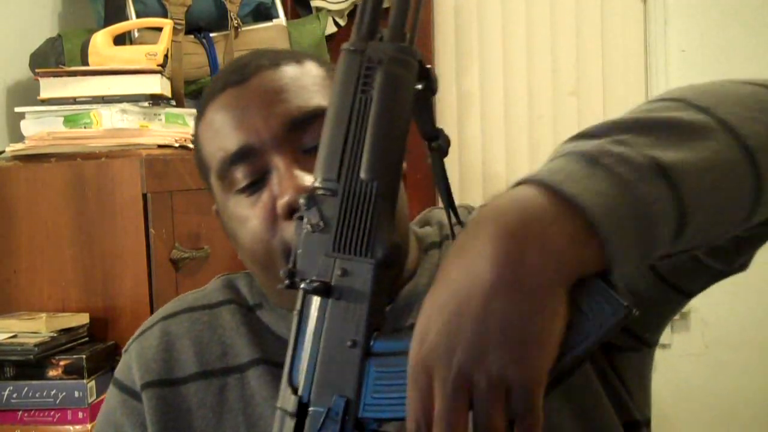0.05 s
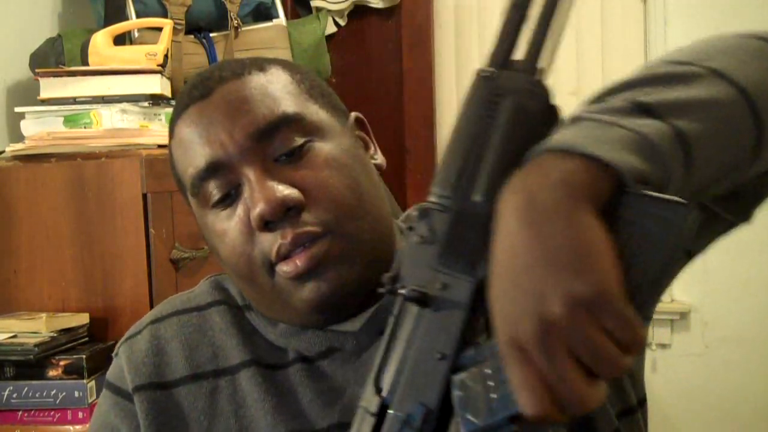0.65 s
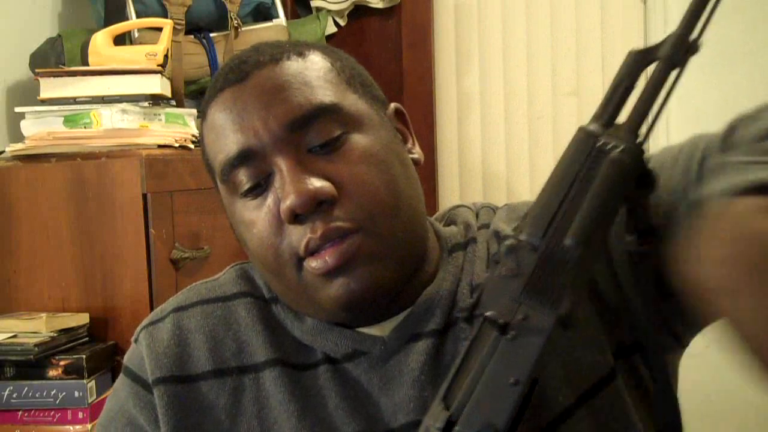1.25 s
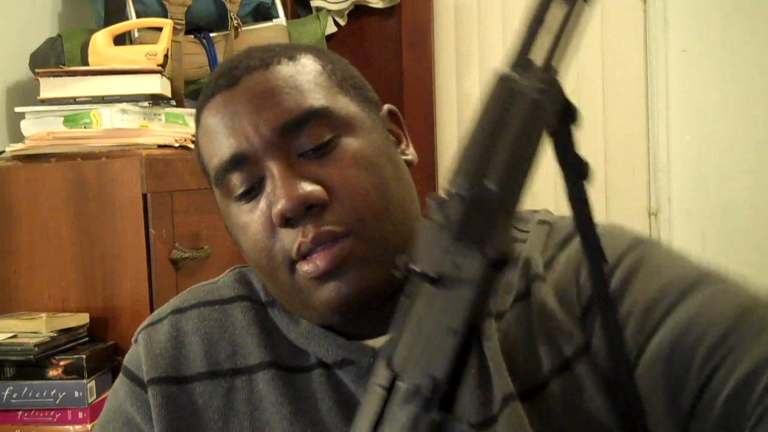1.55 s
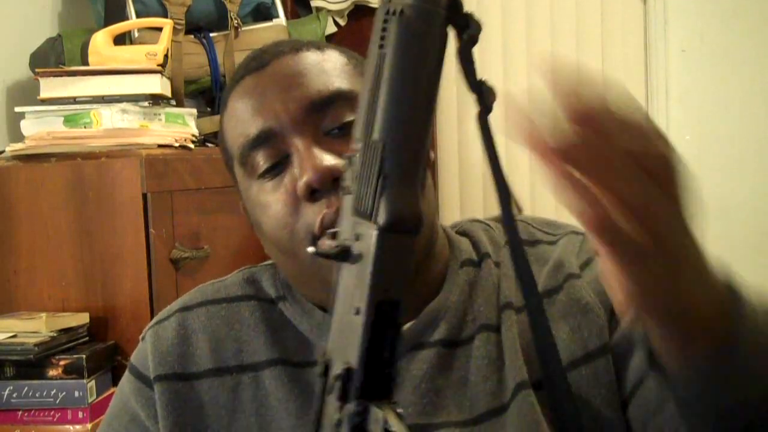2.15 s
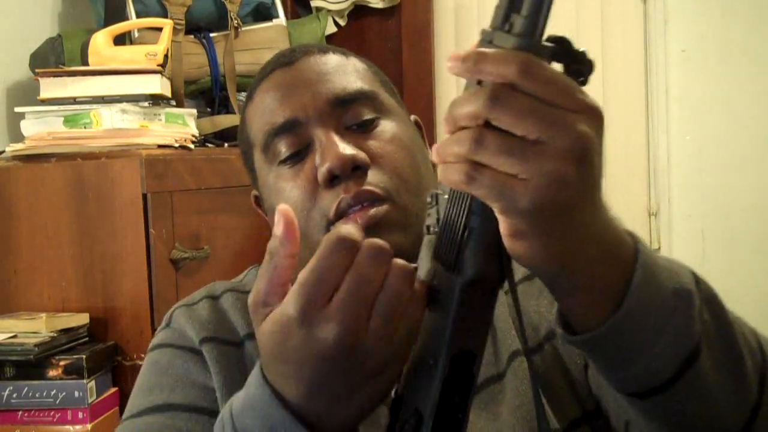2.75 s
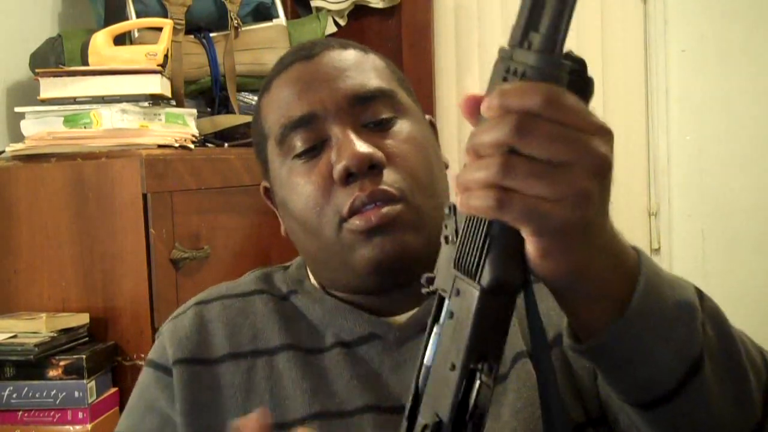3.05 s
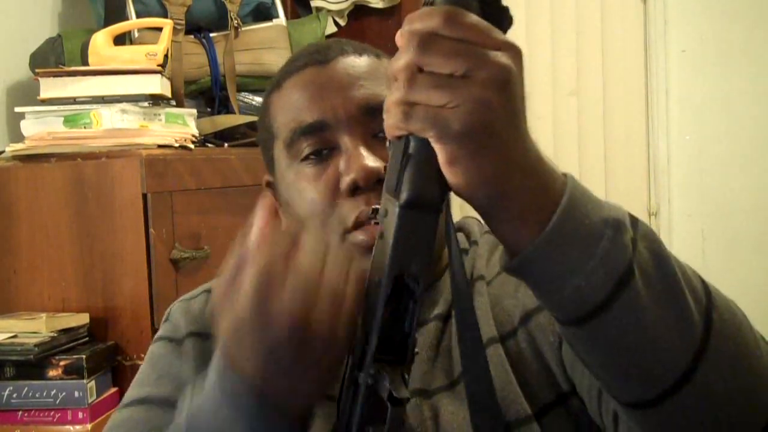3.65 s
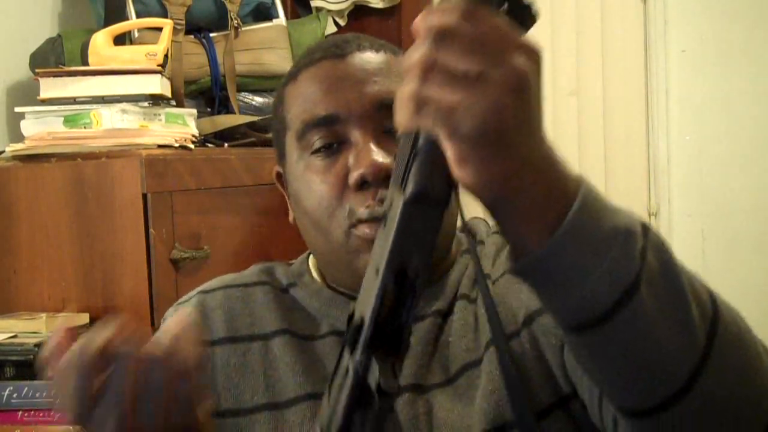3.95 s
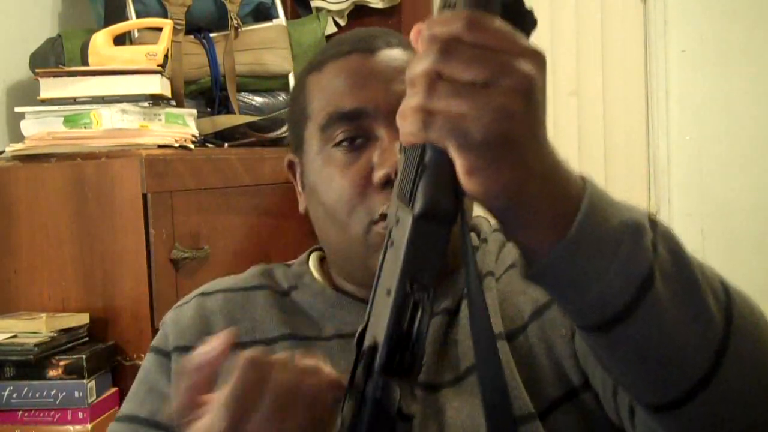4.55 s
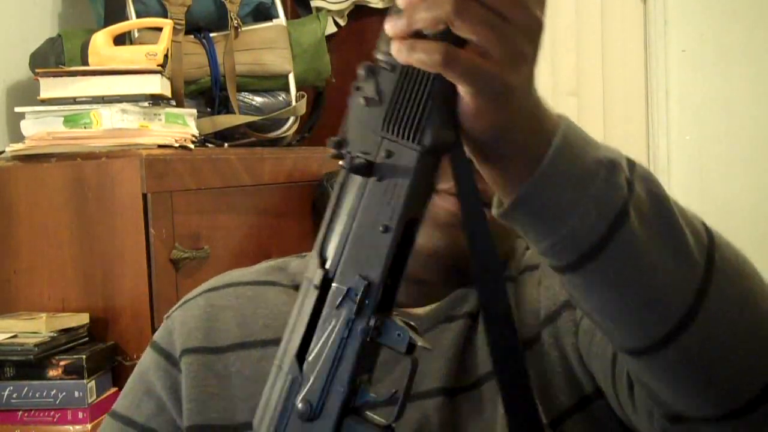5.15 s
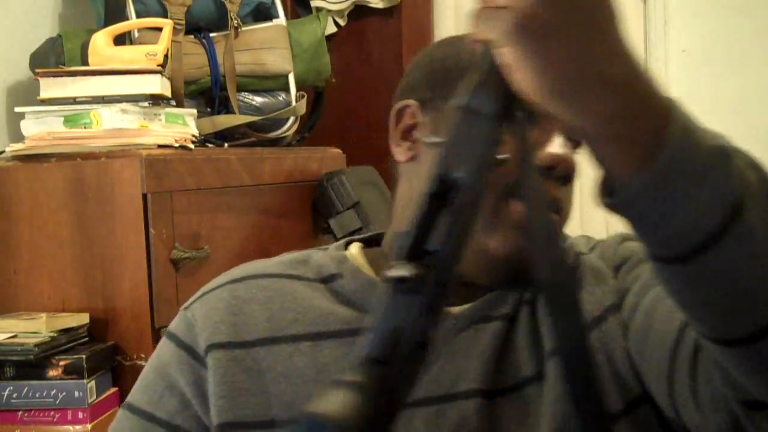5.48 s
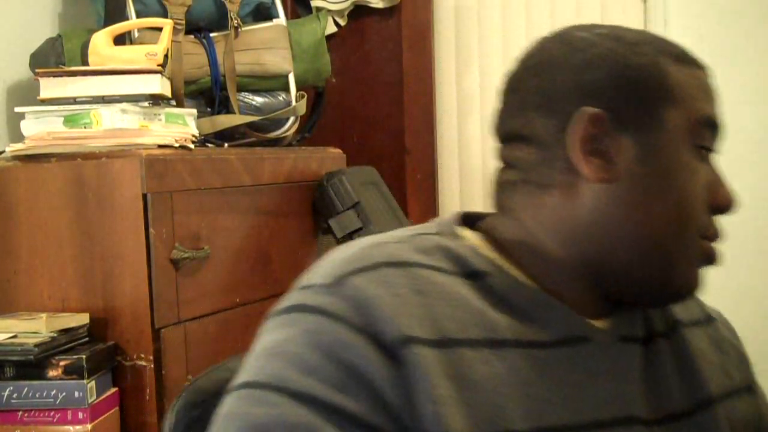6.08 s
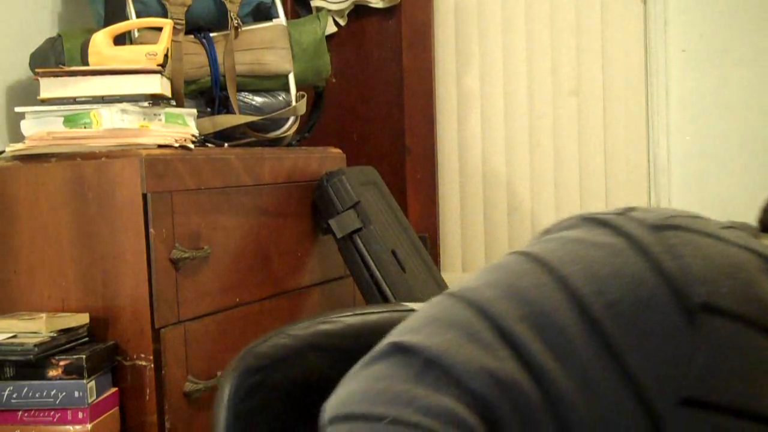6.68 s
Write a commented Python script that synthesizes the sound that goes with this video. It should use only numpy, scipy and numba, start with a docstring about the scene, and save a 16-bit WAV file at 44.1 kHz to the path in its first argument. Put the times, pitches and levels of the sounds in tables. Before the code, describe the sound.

A rifle is handled close to the microphone in a small room with faint background hiss. Sleeves rustle and the magazine knocks lightly against its catch, then snaps sharply at about 0.7 seconds and again, louder, at 1.2. At 2 seconds it clatters onto a desk and rocks to rest, its spring leaving a faint low hum that fades away. The bolt is then racked three times, starting at about 3.1, 3.8 and 4.6 seconds. Each time, steel clacks, scrapes back, knocks along the rails and slams home roughly a quarter of a second later. The loudest hits overload the microphone with a short thump and briefly duck the level. From 5.3 to 6 seconds come light metal clicks, a tiny ping and cloth swishes. The rifle is set down further away with dull, roomy bumps around 6.2 and 6.8 seconds, amid more rustling.

```python
"""Unloading a rifle in a small room

The magazine rocks out of its catch and lands on a desk, its spring humming. The bolt is racked three
times, steel scraping, knocking and slamming home, and the rifle is put aside. Each hit is a burst of tiny
contacts plus the ring of the part; sleeves rustle in between. The loud clacks overload a close
two-port microphone and duck its gain."""
import sys
import numpy as np
from scipy import signal
from scipy.fft import rfft, irfft
from scipy.io import wavfile
from scipy.ndimage import uniform_filter1d
from numba import njit

SR = 44100
rng = np.random.default_rng(int(sys.argv[2]) if len(sys.argv) > 2 else 0)


def master_out(mix):
    """Clip the mix to full scale and print it as 16-bit PCM to the path in sys.argv[1]."""
    frames = np.transpose(np.atleast_2d(mix))
    ceiling = np.clip(frames, -1, 1)
    pcm = np.round(ceiling * 32767).astype(np.int16)
    wavfile.write(sys.argv[1], SR, pcm)


N = 305172
TIME = np.arange(N) / SR

# Levels in the tables are relative: each layer adds its own trim.
# room tone and microphone hiss: (frequency [Hz], level [dB])
ROOM_TONE_COLOUR = [(15, -27.5), (25, 5), (196, -25.5), (354, -14.5), (515, -27), (729, -13), (1180, -17),
                    (3260, -15.5), (3730, -25), (13500, -28), (15000, -42)]
# decay of the room: (frequency [Hz], t60 [s])
ROOM_T60 = [(120, 0.13), (400, 0.22), (1000, 0.45), (2500, 0.38), (6000, 0.34), (13000, 0.27)]
# how alike diffuse sound is at the two ports: (frequency [Hz], correlation [-1..1])
PORT_LIKENESS = [(40, -0.31), (200, 0.91), (550, 0.93), (1200, 0.72), (2500, 0.41), (8000, -0.2)]
# tonal tilt between the ports: (frequency [Hz], left minus right [dB])
PORT_BALANCE = [(100, -3), (500, -1.5), (2000, -3), (4000, -1.5), (5700, -8.5), (6500, 4), (7400, 9),
                (9500, 4.5), (13000, 4.5)]

# tone of each kind of hit: (frequency [Hz], level [dB])
BUMP_COLOUR = [(60, -22.5), (110, -5), (250, -6), (430, -0.5), (640, -5), (850, -2), (1330, -8),
               (1900, -4.5), (3400, -9), (5700, -7), (14000, -37)]
MAGAZINE_COLOUR = [(120, -45), (300, -22), (520, -2), (850, 4.5), (1150, -4), (1850, 0), (2450, -12),
                   (3380, -13.5), (5960, -14.5), (14000, -59)]
CATCH_COLOUR = [(30, -33.5), (60, -21), (339, -21), (720, -10), (1300, -10), (1540, -6), (1670, -10.5),
                (2110, -14), (7160, -3), (8420, -17), (13700, -21.5), (15000, -43.5)]
DESK_COLOUR = [(35, -37), (75, -22), (204, -8.5), (332, -12), (399, -5), (577, -10.5), (895, -6),
               (1240, -14), (2230, -8.5), (3500, -20), (5680, -15), (15000, -42.5)]
STEEL_COLOUR = [(150, -51), (480, -20.5), (850, -8), (1200, -11.5), (1500, -6), (2000, -8), (3300, -6.5),
                (4400, -4), (5200, 0), (6200, 2), (7600, -6.5), (10400, -19.5), (14200, -28), (16000, -54)]
SLAM_COLOUR = [(40, -8), (260, -7), (500, -8), (910, -6.5), (1800, -10), (2700, -8), (4500, -8),
               (5600, 0.5), (7900, -4.5), (10300, -18), (14000, -21), (16000, -65)]
# ring of each struck part: (frequency [Hz], level [dB], t60 [s])
BUMP_MODES = [(124.5, -12, 0.13), (297, -6, 0.13), (442, 8, 0.071), (518, 3.5, 0.073), (716, -0.5, 0.047)]
MAGAZINE_MODES = [(780, -1, 0.079), (886, -10.5, 0.22), (1306, -6, 0.1), (1490, 0.5, 0.069),
                  (1920, 4, 0.06)]
DESK_MODES = [(129.4, -14.5, 0.77), (209, -12.5, .5), (303, -11.5, 0.98), (397, -7.5, 0.25),
              (538, -8.5, 0.57), (726, -7.5, 0.27), (882, -2.5, 0.24), (2200, -6, 0.13)]
RECEIVER_MODES = [(830, -9, 0.2), (929, -6, 0.28), (2500, -3.5, .2), (3760, -16, 0.22), (5030, 0.5, 0.064),
                  (5500, -8, .07), (8660, -14.5, 0.11)]
CARRIER_MODES = [(911, -3.5, 0.13), (5100, -7, 0.043), (5340, 1.5, 0.036), (5640, -5, 0.06),
                 (6070, 0.5, 0.061), (6600, -7, 0.036), (7370, -2, 0.045)]
# lingering notes of the magazine spring: (frequency [Hz], level [dB])
SPRING_NOTES = [(129, -2), (148, -2.5), (187, -2), (316, -5.5), (366, 1.5), (468, 0.5), (549, -1.5),
                (626, -8.5)]

# swishes of sleeve, palm or sling, and the magazine's scrape before its second snap:
# (middle [s], length [s], hiss [dB], rub [dB])
SLIDES = [(0.272, 0.088, -46, -49.5), (0.5, 0.22, -45.5, -56.5), (0.539, 0.011, -36, -40),
          (0.892, 0.12, -52, -39.5), (1.03, 0.32, -49, -59), (1.187, 0.081, -31, -35),
          (1.383, 0.39, -44.5, -43.5), (2.025, 0.034, -49, -46.5), (2.527, 0.045, -37, -43),
          (2.593, 0.091, -36, -46), (3.784, 0.014, -34, -49), (4.487, 0.055, -49.5, -61),
          (5.342, 0.041, -39.5, -51), (5.401, 0.042, -35, -44), (5.505, 0.21, -48.5, -42),
          (5.88, 0.081, -43, -54), (6.096, 0.47, -45, -59), (6.367, 0.37, -44.5, -43.5),
          (6.718, 0.25, -48.5, -45.5), (6.92, 0.15, -32.5, -36.5)]
# faint beds of rustle as the arms shift: (start [s], end [s], hiss [dB], rub [dB])
RUSTLES = [(0, 1.9, -56.5, -59), (1.899, 3.1, -56.5, -54.5), (5.36, 10, -54.5, -58)]
# light touches on lever and sling swivels: (time [s], treble [dB], body [dB])
TICKS = [(0.138, -35, -47.5), (0.265, -49.5, -48), (1.897, -43.5, -44.5), (2.733, -40, -68),
         (3.308, -22, -32), (4.785, -22, -34.5), (5.3725, -27, -36), (5.904, -31.5, -40),
         (5.9295, -23.5, -41.5), (5.963, -37, -39)]
# the rifle is set down and settles: (time [s], treble [dB], body [dB])
BUMPS = [(6.212, -35, -22.5), (6.223, -26.5, -21.5), (6.245, -24, -23), (6.739, -38.5, -27.5),
         (6.751, -35, -25.5), (6.766, -37.5, -35), (6.888, -32, -35)]
# the magazine rocks against its catch: (time [s], treble [dB], body [dB])
MAGAZINE_ROCKS = [(0.548, -26.5, -18), (0.6835, -35, -15.5), (1.123, -37, -41.5), (1.161, -32, -30),
                  (1.174, -27.5, -34.5), (1.324, -17.5, -26.5)]
# the catch snaps: (time [s], treble [dB], body [dB])
CATCH_SNAPS = [(0.711, -7, -12), (1.21, -0.5, -9)]
# latch, lug and rebound within one snap: (delay [s], treble [dB], body [dB])
SNAP_CONTACTS = [(0, -2.5, -0.5), (0.0035, -9.5, 4), (0.009, -5.5, -6)]
# the magazine lands and rocks to rest: (time [s], treble [dB], body [dB])
DESK_HITS = [(2.0285, -5.5, -4), (2.0595, -12.5, -8), (2.079, -15, -10.5), (2.108, -19, -18.5),
             (2.1155, -7.5, -6.5), (2.163, -25, -16), (2.177, -18, -20.5)]
# the hand takes up the play in the charging handle: (time [s], treble [dB], body [dB])
GRIPS = [(2.9835, -24, -27.5), (3.061, -25, -33.5), (3.784, -21.5, -29), (3.806, -22, -41.5),
         (4.5205, -31.5, -33.5)]
# the bolt unlocks and rides over the hammer: (time [s], treble [dB], body [dB], receiver ring [dB])
PULLS = [(3.115, -3.5, -21, -15), (3.134, -2, -18, -16), (3.1435, -3, -20, -13), (3.1745, -11, -22, -9),
         (3.8168, -12, -34, 2), (3.836, -10, -28, -1.5), (3.8442, -11.5, -25, -1), (3.877, -13, -23, -4.5),
         (3.883, -10.5, -24, 2), (4.5718, -11.5, -33, 0), (4.5922, -13.5, -30, 2.5), (4.602, -7.5, -23, -6),
         (4.639, -13, -25.5, 1), (4.647, -11.5, -26, -7)]
# the carrier hits the rear stop and knocks along the rails: (time [s], treble [dB], body [dB])
KNOCKS = [(3.2208, -4.5, -25), (3.23, -8, -23), (3.2572, -7.5, -17.5), (3.3084, -30, -31),
          (3.3285, -10.5, -26), (3.3445, -5.5, -21), (3.36, -11, -27), (3.9357, -6, -24),
          (3.947, -9.5, -24.5), (4.021, -24.5, -36.5), (4.027, -10, -33), (4.045, -8.5, -25),
          (4.052, -13, -27), (4.064, -15, -26), (4.078, -9, -24), (4.696, -10.5, -28), (4.7025, -5, -18),
          (4.713, -12.5, -27), (4.798, -6.5, -28.5), (4.815, -13.5, -27.5), (4.823, -12, -36),
          (4.835, -7, -18), (4.849, -6.5, -22)]
# cues of each racking: (unlock [s], rear stop [s], release [s], slam [s], slam level [dB])
RACKS = [(3.1112, 3.218, 3.3285, 3.367, -2), (3.816, 3.9375, 4.027, 4.0855, -2),
         (4.5698, 4.704, 4.798, 4.858, -2.5)]


def undb(db):
    """Decibels to gain."""
    return 10 ** (np.asarray(db) / 20)


def at_hz(points, hz):
    """Read (Hz, value) points on a log-frequency axis."""
    point_hz, value = np.transpose(points)
    return np.interp(np.log(hz + 1), np.log(point_hz), value)


def response(points, size=2048):
    """Minimum-phase impulse response with the given (Hz, dB) colour."""
    cepstrum = irfft(np.log(undb(at_hz(points, np.fft.rfftfreq(size, 1 / SR)))))
    cepstrum[1:size // 2] *= 2
    cepstrum[size // 2 + 1:] = 0
    return irfft(np.exp(rfft(cepstrum)))


def unit(x):
    """Scale to unit energy."""
    return x / np.sqrt(np.sum(x ** 2, axis=-1, keepdims=True))


def convolve(x, ir):
    """Filter, keeping the length."""
    return signal.fftconvolve(np.atleast_2d(x), np.atleast_2d(ir), axes=-1)[:, :np.shape(x)[-1]]


def filtered(x, kind, hz, order=3):
    """Plain high-, low- or band-pass."""
    return signal.sosfilt(signal.butter(order, hz, kind, fs=SR, output="sos"), x)


def treble_and_body(colour, split_hz=2500):
    """Split a colour into two impulse responses, each with unit energy."""
    return [unit(filtered(response(colour), kind, split_hz)) for kind in ("high", "low")]


def add(track, time_s, sound):
    """Mix a sound into a track at its cue."""
    start = max(int(time_s * SR), 0)
    part = track[start:start + len(sound)]
    part += sound[:len(part)]


def port_noise(size):
    """Diffuse noise at the two ports: centred in the low mids, wide in the treble."""
    mid, side = rfft(rng.standard_normal((2, size)))
    likeness = at_hz(PORT_LIKENESS, np.fft.rfftfreq(size, 1 / SR))
    mid, side = mid * np.sqrt((1 + likeness) / 2), side * np.sqrt((1 - likeness) / 2)
    return irfft([mid + side, mid - side], size)


def room_tone(db=-57.5):
    """A faint, steady bed of room and microphone noise."""
    return undb(db) * convolve(port_noise(N), unit(response(ROOM_TONE_COLOUR)))


def room(scatter_db=-1, scatter_s=0.0041, build_s=0.0055):
    """Direct sound with scatter from desk and chest, and the walls' tail, longest in the mids."""
    t = TIME[:SR * 3 // 4]
    near = undb(scatter_db) * unit(port_noise(len(t)) * t * np.exp(-2 * t / scatter_s))
    near[:, 0] += 1  # the direct sound
    # the scatter smears a click in time and leaves its colour even
    spectrum = rfft(near)
    smooth_power = uniform_filter1d(np.abs(spectrum) ** 2, size=80)
    near = irfft(spectrum / np.sqrt(smooth_power), len(t)) * (t < t[-1] / 2)
    hz, age_s, cells = signal.stft(port_noise(len(t)), SR, nperseg=256)
    decay = 1000 ** (-age_s / at_hz(ROOM_T60, hz)[:, None])
    tail = signal.istft(cells * decay, SR)[1][:, :len(t)]
    return unit(near), unit(tail * (1 - np.exp(-(t / build_s) ** 2)))


def friction(grain_db=2.5, grains_per_s=90, fade_s=0.13):
    """Cloth, palm and magazine catch and slip: grainy hiss over a duller rub, swelling with each move."""
    power = np.zeros((2, N))
    for middle, length, *db in SLIDES:
        power += np.outer(undb(db) ** 2, np.exp(-2 * (2 * (TIME - middle) / length) ** 2))
    for start, end, *db in RUSTLES:
        outside_s = np.maximum(np.maximum(start - TIME, TIME - end), 0)
        power += np.outer(undb(db) ** 2, np.exp(-2 * (2 * outside_s / fade_s) ** 2))
    hiss, rub = np.sqrt(power)
    grain_times = np.cumsum(rng.exponential(1 / grains_per_s, 2000))
    grain = undb(grain_db * np.interp(TIME, grain_times, rng.standard_normal(len(grain_times))))
    bright, dull = treble_and_body(STEEL_COLOUR)[0], treble_and_body(BUMP_COLOUR)[1]
    return grain * (hiss * convolve(port_noise(N), bright) + rub * convolve(port_noise(N), dull))


def ping(time_s=5.768, hz=3316, db=-36, t60=0.029):
    """A small steel part is flicked and rings on one note."""
    out = np.zeros(N)
    t = TIME[:SR // 2]
    add(out, time_s, undb(db) * np.sin(2 * np.pi * hz * t) * 1000 ** (-t / t60))
    return out


def chatter(decay_s, snap_db=-2, evenness=0.68, size=4096):
    """Hard faces meet with one snap, then a dying burst of tiny contacts."""
    burst = unit(rng.standard_normal(size) * np.exp(-TIME[:size] / decay_s))
    burst[0] += undb(snap_db) * min(0.0019 / decay_s, 1)  # a long, soft contact has less snap
    # the contacts have no pitch of their own: their colour is partly evened out
    colour_db = 10 * np.log10(uniform_filter1d(np.abs(rfft(burst)) ** 2, size=7))
    equaliser = response(np.column_stack([np.fft.rfftfreq(size, 1 / SR) + 1, -evenness * colour_db]))
    return unit(convolve(burst, equaliser)[0])


def hits(cues, colour, modes, space, chatter_s, treble_db, body_db, ring_db, room_db,
         detune=0.0026, spread_db=3):
    """Each hit cracks in the colour of the part and rings its modes in a fresh mix and tuning."""
    treble, body, ring = np.zeros((3, N))
    hz, mode_db, t60 = np.transpose(modes)
    t = TIME[:int(max(t60) * SR)]
    fade = 1000 ** (-t / t60[:, None])
    for time_s, high_db, low_db, *extra_ring_db in cues:
        burst = chatter(chatter_s)
        add(treble, time_s, undb(high_db + treble_db) * burst)
        add(body, time_s, undb(low_db + body_db) * burst)
        strength, shift, polarity = rng.standard_normal((3, len(hz)))
        force_db = np.where(hz > 2500, high_db, low_db)
        level_db = force_db + mode_db + ring_db + sum(extra_ring_db) + spread_db * strength
        partials = fade * np.sin(2 * np.pi * (hz * (1 + detune * shift))[:, None] * t)
        add(ring, time_s, (np.sign(polarity) * undb(level_db)) @ partials)
    high, low = treble_and_body(colour)
    near, tail = space
    return convolve(convolve(treble, high) + convolve(body, low) + ring, near + undb(room_db) * tail)


def ticks(space):
    """Lever and sling swivels give small, crisp steel clicks."""
    return hits(TICKS, STEEL_COLOUR, CARRIER_MODES, space, chatter_s=0.0014,
                treble_db=25, body_db=26.5, ring_db=-8, room_db=-3, detune=0.032)


def set_down(space):
    """The rifle is laid further away: dull, roomy bumps."""
    return hits(BUMPS, BUMP_COLOUR, BUMP_MODES, space, chatter_s=0.0085,
                treble_db=29, body_db=23.5, ring_db=-5.5, room_db=0.5)


def magazine_spring(time_s=2.06, hum_db=-43, hum_t60=2.8, shiver_db=-34, shiver_t60=1.6):
    """The jolted spring shivers in a dense cluster of low modes; a few notes hum on."""
    out = np.zeros(N)
    hum = sum(undb(db) * np.sin(2 * np.pi * hz * TIME) for hz, db in SPRING_NOTES)
    shiver = filtered(rng.standard_normal(N), "band", [115, 440])
    add(out, time_s, undb(hum_db) * hum * 1000 ** (-TIME / hum_t60))
    add(out, time_s, undb(shiver_db) * shiver / np.std(shiver) * 1000 ** (-TIME / shiver_t60))
    return out


def magazine(space):
    """The magazine rocks against its catch, snaps free and clatters onto the desk."""
    rocking = hits(MAGAZINE_ROCKS, MAGAZINE_COLOUR, MAGAZINE_MODES, space, chatter_s=0.0049,
                   treble_db=27, body_db=21.5, ring_db=-22.5, room_db=-6.5)
    contacts = [(time_s + delay_s, treble + high, body + low)
                for time_s, treble, body in CATCH_SNAPS for delay_s, high, low in SNAP_CONTACTS]
    snaps = hits(contacts, CATCH_COLOUR, MAGAZINE_MODES, space, chatter_s=0.003,
                 treble_db=35, body_db=33, ring_db=-9.5, room_db=-12.5, detune=0.014)
    landing = hits(DESK_HITS, DESK_COLOUR, DESK_MODES, space, chatter_s=0.0032,
                   treble_db=28.5, body_db=27, ring_db=-9, room_db=-7.5, detune=0.018)
    return rocking + snaps + landing


def rail_scrape(space, pull_db=-27.5, return_db=-19, shudder_s=0.04, slips_per_s=1100, room_db=-7):
    """The carrier slides back, then forward, in dense, uneven slips and shudders on after each stop."""
    slips = np.zeros(N)
    for unlock, rear, release, slam, _ in RACKS:
        for start, stop, db in [(unlock, rear, pull_db), ((release + slam) / 2, slam, return_db)]:
            size = int((stop + shudder_s - start) * SR)
            count = int(slips_per_s * size / SR) + 1
            kicks = rng.choice([-1, 1], count) * undb(0.5 * rng.exponential(size=count))
            grains = np.zeros(size)
            grains[rng.integers(0, size, count)] = kicks
            add(slips, start, undb(db) * np.sqrt(size) * unit(grains))
    near, tail = space
    return convolve(convolve(slips, unit(response(STEEL_COLOUR))), near + undb(room_db) * tail)


def slam_thumps(slams, hz=150, trim_db=4.5, rise_s=0.0033):
    """One short, low thump on each slam, like an overloaded microphone."""
    out = np.zeros(N)
    t = TIME[:SR // 10]
    thump = np.sin(2 * np.pi * hz * t) * t / rise_s * np.exp(1 - t / rise_s)
    for time_s, _, body_db in slams:
        add(out, time_s, undb(trim_db + body_db) * thump)
    return out


def bolt(space):
    """Each racking: unlock, slide back, hit the rear stop, run forward on the spring and slam home."""
    out = hits(PULLS, STEEL_COLOUR, RECEIVER_MODES, space, chatter_s=0.0029,
               treble_db=24.5, body_db=24.5, ring_db=-1, room_db=-9.5)
    # a wide random detune stands for the carrier's ring shifting with its place on the rails
    out += hits(KNOCKS, STEEL_COLOUR, CARRIER_MODES, space, chatter_s=0.0037,
                treble_db=24.5, body_db=26.5, ring_db=-5.5, room_db=-9, detune=0.063)
    slams = [(slam, db - 7, db - 17.5) for *_, slam, db in RACKS]  # (time [s], treble [dB], body [dB])
    out += hits(slams, SLAM_COLOUR, CARRIER_MODES, space, chatter_s=0.02,
                treble_db=35.5, body_db=33.5, ring_db=-3, room_db=-9, detune=0.018)
    out += hits(GRIPS, STEEL_COLOUR, RECEIVER_MODES, space, chatter_s=0.0047,
                treble_db=25, body_db=26.5, ring_db=-6.5, room_db=-4.5)
    return out + slam_thumps(slams) + rail_scrape(space)


def scene():
    """All the handling in one room, over faint room tone."""
    space = room()
    quiet_layers = friction() + ping() + magazine_spring() + room_tone()
    return quiet_layers + magazine(space) + bolt(space) + ticks(space) + set_down(space)


@njit
def follow(x, attack, release):
    """Envelope follower with separate rates for rising and sinking."""
    out, level = np.empty(len(x)), 0.
    for i in range(len(x)):
        level += (x[i] - level) * (attack if x[i] > level else release)
        out[i] = level
    return out


def record(dry, thump_band_hz=(20, 300), knee_db=-10, attack_s=0.036, release_s=0.53, slope=0.83,
           ceiling=0.84, top_hz=14600):
    """Overloaded capsules thump; gain control ducks after loud clacks, whose first peaks clip."""
    ports = [response([(hz, side * db / 2) for hz, db in PORT_BALANCE]) for side in (1, -1)]
    sound = convolve(dry, np.array(ports))
    # peaks beyond the capsules' range are rectified, which pushes their output off centre
    excess = np.tanh(np.maximum(np.abs(sound) - 1, 0))
    thump = filtered(excess, "band", thump_band_hz, order=1)
    sound += thump * np.array([[1], [0.099]])  # mostly on the left
    level = follow(np.abs(sound).max(axis=0), 1 / (attack_s * SR), 1 / (release_s * SR))
    gain = np.maximum(level / undb(knee_db), 1) ** -slope
    clipped = np.clip(sound * gain, -ceiling, ceiling)
    return signal.sosfilt(signal.ellip(8, .2, 70, top_hz, fs=SR, output="sos"), clipped)


dry = scene()
out = record(dry)
master_out(out)
```